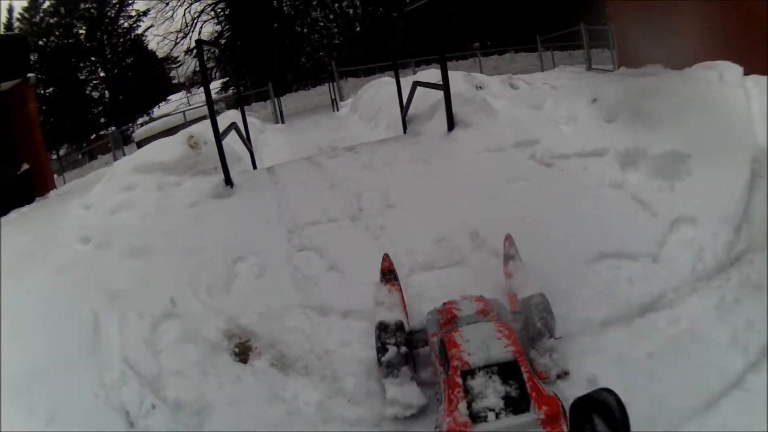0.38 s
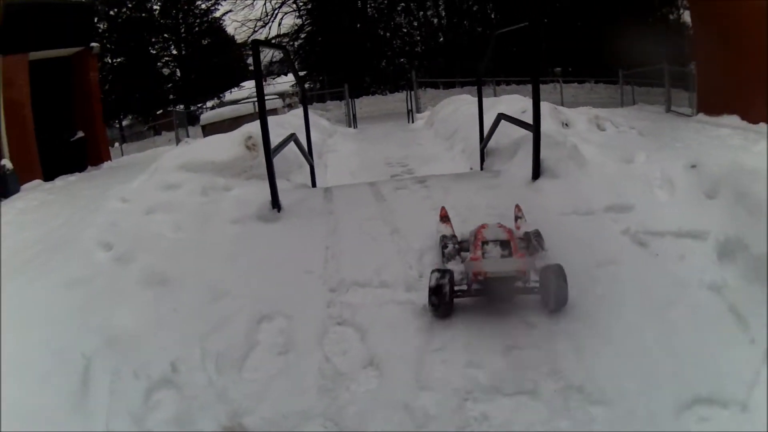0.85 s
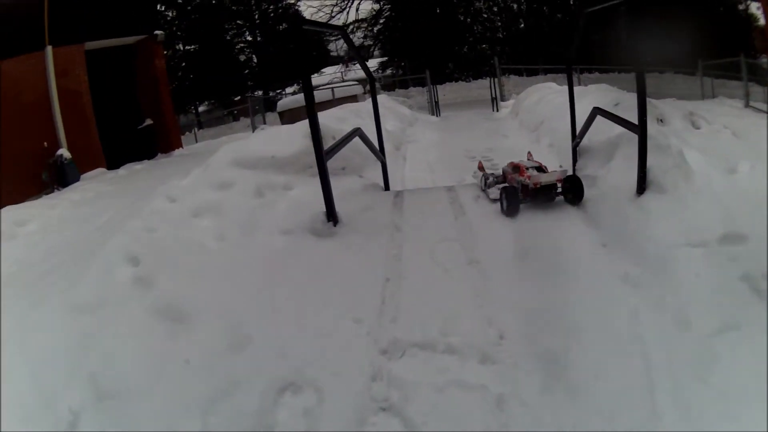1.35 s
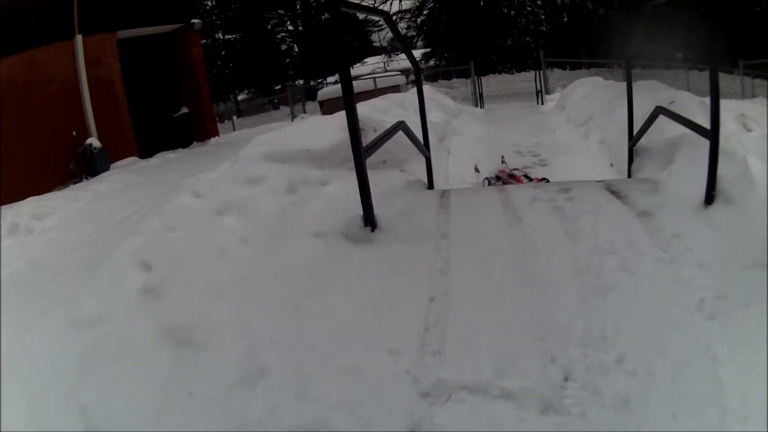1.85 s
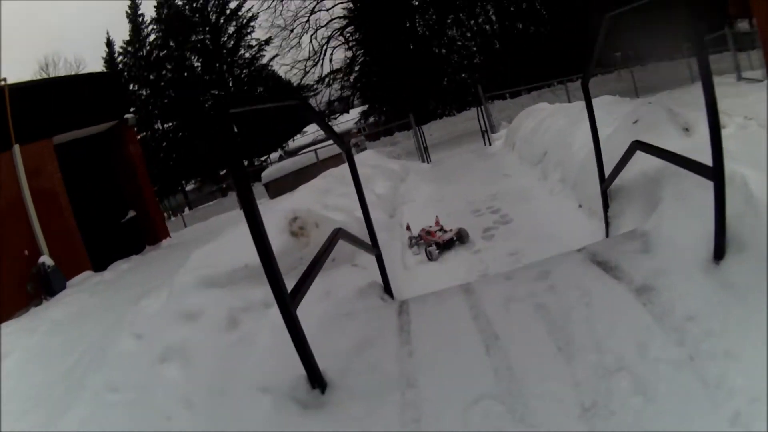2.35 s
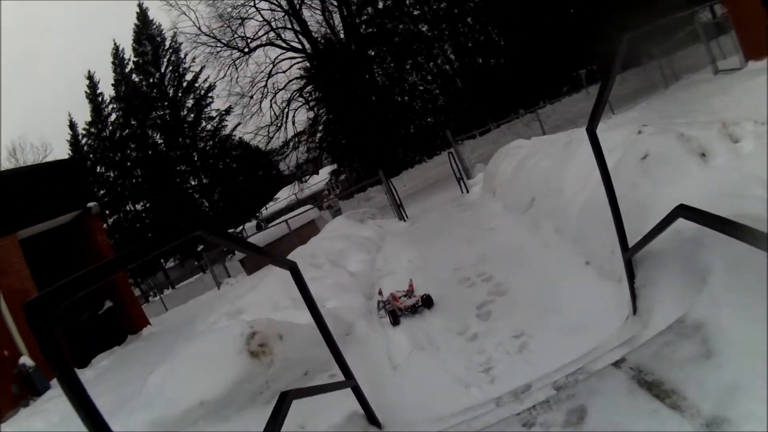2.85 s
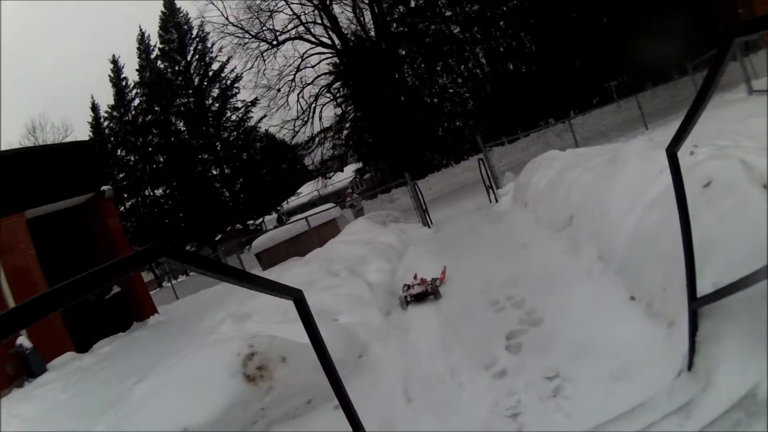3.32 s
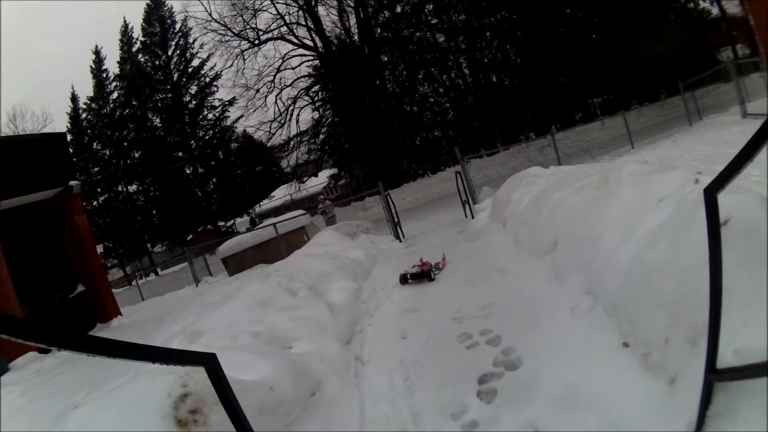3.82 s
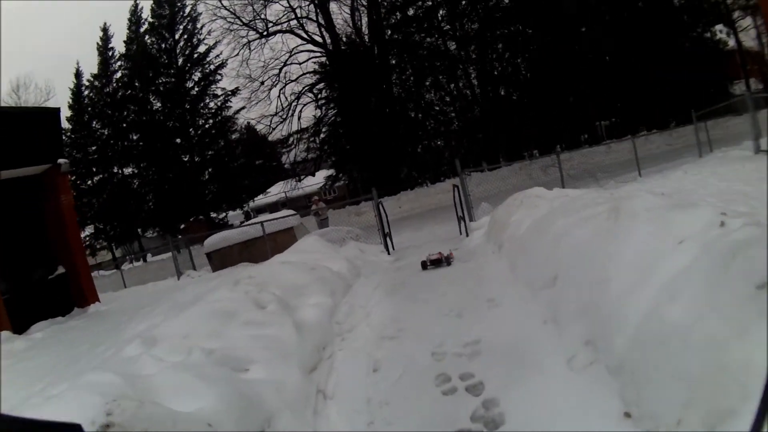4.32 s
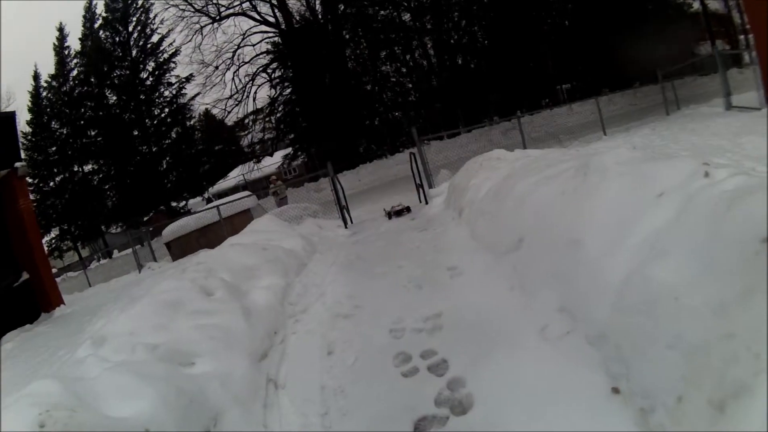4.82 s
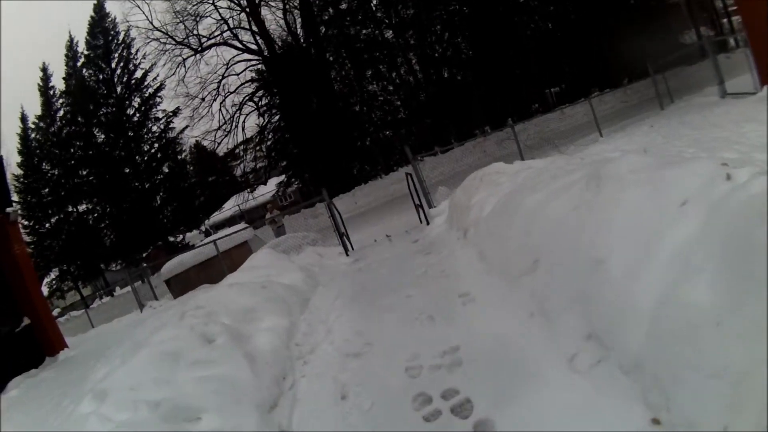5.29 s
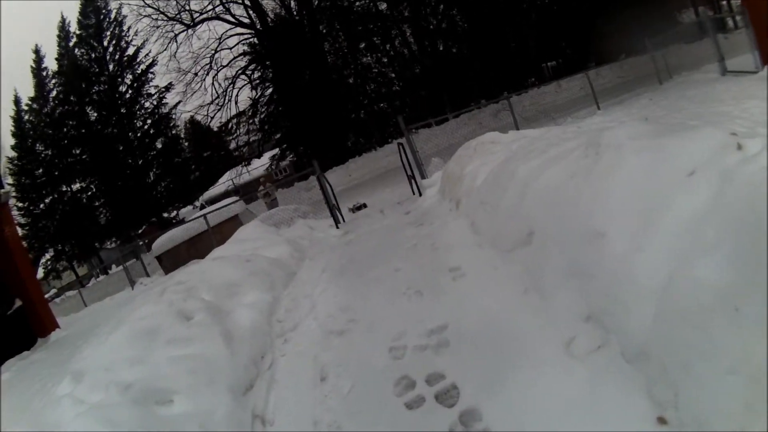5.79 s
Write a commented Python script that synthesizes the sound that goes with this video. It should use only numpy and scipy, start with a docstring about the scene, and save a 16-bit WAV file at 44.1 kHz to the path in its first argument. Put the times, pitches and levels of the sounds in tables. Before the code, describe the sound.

A small electric car works through snow beside a hand-held microphone, outdoors, dry, with a soft steady bed of still air. From 0 to 0.7 s it is loudest: gear whine dives, climbs and wavers over harsh grainy rattle and crunching snow, with dull knocks at 0.35 to 0.5. A second burst sinks until 1.1, with a bright tick at 0.84. After a short lull, from 1.25 to 1.65 the whine sweeps up steeply, then fades. Around 2.0 to 2.2 only ticks and knocks; near-quiet follows, with a faint low hand bump at 2.4. Weaker, distant bursts resume at 2.5, climbing to a piercing peak at 3.35 and dropping quickly by 3.55. Low, fluttering whirrs pulse from 3.65 to 4.75. A last run rises from 4.8 to a very thin squeal near 5.25 and cuts off. Quiet air, sparse ticks and a soft knock end it at 6 s.

```python
"""Small electric car in snow

A small electric car claws its way through snow in a yard and drives off from a hand-held camera.
Gear whine is gliding partials of the tooth rate; loose teeth are dense grains ringing the chassis.
Churned snow is coloured grains that swell at heaps; the speed controller adds thin high tones.
Ticks and knocks are damped rings with a noise crack, a hand bump is a short low swing,
and shaped noise makes the still winter air and the hiss."""
import sys
import numpy as np
from scipy import signal
from scipy.fft import rfft, irfft, next_fast_len
from scipy.io import wavfile

SR = 44100
rng = np.random.default_rng(int(sys.argv[2]) if len(sys.argv) > 2 else 0)


def transcribe(u):
    """Save the signal u as a 16-bit wav file named by the first command-line argument.

    u: samples, shape (n,) or (channels, n), limited to [-1, 1]; the rate is SR.
    q: integer samples, one column per channel.
    """
    v = np.clip(np.atleast_2d(u).T, -1, 1)
    q = np.round(v * 32767).astype(np.int16)
    wavfile.write(sys.argv[1], SR, q)


def gain_from_db(level_db):
    """Convert decibel levels to linear amplitude factors (20 dB per decade)."""
    decades = np.asarray(level_db, float) / 20
    return 10 ** decades


N = 271788

# gear whine glides, one list per burst of throttle: start_s, tooth_rate_hz, level_db before partial shares
BURSTS = [
    [(0.006, 3480, -43), (0.068, 3062, -52.5), (0.104, 2728, -42.5), (0.141, 1903, -45.5),
     (0.199, 1465, -46.5), (0.269, 2158, -43), (0.333, 2900, -38.5), (0.361, 3217, -50), (0.429, 3087, -57),
     (0.463, 3313, -45), (0.537, 2960, -54), (0.64, 2860, -43.5), (0.656, 3085, -58), (0.676, 2535, -37),
     (0.695, 2450, -36.5), (0.738, 1590, -59)],
    [(0.75, 2200, -53), (0.802, 2040, -48), (0.85, 1581, -53), (0.922, 2274, -44), (0.99, 1440, -51.5),
     (1.079, 1320, -66)],
    [(1.181, 1077, -65), (1.233, 1334, -68), (1.261, 1432, -44.5), (1.301, 1880, -46), (1.335, 2520, -49),
     (1.352, 2920, -48), (1.383, 3970, -47), (1.409, 4000, -47), (1.451, 4390, -45), (1.472, 4730, -47),
     (1.51, 5100, -53), (1.54, 5330, -46), (1.576, 5130, -54), (1.602, 5580, -45), (1.63, 5540, -63),
     (1.662, 5090, -64), (1.724, 3910, -67), (1.78, 4170, -70)],
    [(2.5, 1483, -83), (2.56, 1501, -63), (2.61, 1767, -66), (2.66, 1780, -62.5), (2.75, 2500, -52),
     (2.819, 2000, -63)],
    [(2.831, 2060, -74), (2.869, 2450, -54.5), (2.935, 3590, -62), (2.957, 3950, -57), (2.997, 4236, -55),
     (3.031, 4040, -56), (3.071, 4210, -54), (3.097, 4040, -54), (3.141, 4120, -56.5), (3.177, 3930, -52.5),
     (3.215, 5120, -53), (3.296, 6920, -53), (3.322, 6950, -47), (3.358, 7730, -38.5), (3.396, 7570, -42),
     (3.438, 7020, -50), (3.464, 6130, -54), (3.498, 4440, -75), (3.532, 2855, -48.5), (3.58, 1856, -76)],
    [(3.642, 1391, -73), (3.679, 1736, -55), (3.731, 2870, -66), (3.761, 3415, -61), (3.821, 3000, -54),
     (3.849, 2790, -52), (3.883, 2770, -62), (3.911, 2580, -52), (3.935, 2350, -59), (3.971, 1800, -72),
     (4.011, 1962, -62), (4.085, 1930, -58)],
    [(4.097, 2950, -67), (4.124, 3010, -55), (4.212, 2930, -64), (4.296, 3040, -55.5), (4.334, 3440, -66),
     (4.38, 3500, -63)],
    [(4.462, 1922, -75), (4.506, 2160, -66), (4.579, 2660, -54), (4.621, 3016, -55), (4.699, 2230, -62.5),
     (4.729, 2150, -78)],
    [(4.791, 2200, -64), (4.837, 2436, -62), (4.891, 2660, -62), (4.919, 2750, -59), (4.963, 3835, -58),
     (4.992, 4590, -64), (5.002, 4720, -54), (5.036, 5120, -49), (5.058, 5780, -53), (5.078, 6160, -48),
     (5.112, 6690, -49), (5.172, 7500, -47), (5.208, 8800, -49), (5.278, 9760, -59), (5.3, 9400, -80)],
]
# chassis modes: pitch_hz, width_hz, level_db of the ring under the rattle
CHASSIS_MODES = [(1900, 90, -21), (2570, 90, -17), (2880, 90, -15.5), (3250, 100, -16), (4080, 110, -16),
                 (4330, 110, -16), (4560, 140, -12), (5250, 120, -20)]


def rms_one(x):
    """Scale to unit power."""
    return x / np.sqrt(np.mean(x ** 2) + 1e-20)


def in_time(rows):
    """Each column of a table as a value per sample, in straight lines between rows."""
    s, *columns = np.transpose(rows)
    return [np.interp(np.arange(N) / SR, s, column) for column in columns]


def drift(rate_hz):
    """Slow chance: noise twice through a one-pole low-pass, spread 1."""
    step = 20   # samples between slow values
    r = np.exp(-2 * np.pi * step * rate_hz / SR)
    noise = rng.standard_normal(N // step + 2002)
    slow = signal.lfilter([1], [1, -2 * r, r * r], noise)[2000:]   # the filter has settled
    return np.interp(np.arange(N) / step, np.arange(len(slow)), rms_one(slow))


def fade(start_s, end_s, edge_s):
    """A gate with straight edges, half open at start and end."""
    t = np.arange(N) / SR
    return np.clip(np.minimum(t - start_s, end_s - t) / edge_s + .5, 0, 1)


def grains(per_s, spread_db):
    """Random contacts of uneven size and sign; rms 1."""
    sizes = gain_from_db(spread_db * np.minimum(rng.exponential(1, N), 5))
    signed = sizes * rng.choice([-1, 1], N)
    return rms_one(signed * (rng.random(N) < per_s / SR))


def coloured(source, spectrum, patchy_db, patch_rate_hz):
    """A source given a spectrum, split in overlapping bands 0.4 octave apart that each flicker; rms 1."""
    hz, level_db = np.transpose(spectrum)
    size = next_fast_len(N)
    octave = np.log2(np.maximum(np.arange(size // 2 + 1) * SR / size, 1))
    gain_db = np.interp(octave, np.log2(hz), level_db, left=-120, right=-120)
    shaped = rfft(source, size) * gain_from_db(gain_db)
    out = 0
    for centre in np.arange(np.log2(hz[0]), np.log2(hz[-1]) + .4, .4):
        share = np.clip(1 - np.abs(octave - centre) / .4, 0, 1)
        band = irfft(shaped * share, size)[:N]
        out = out + band * gain_from_db(patchy_db * drift(patch_rate_hz))
    return rms_one(out)


def resonance(x, hz, width_hz):
    """A two-pole peak with gain 1 on top."""
    r = np.exp(-np.pi * width_hz / SR)
    poles = [1, -2 * r * np.cos(2 * np.pi * hz / SR), r * r]
    return signal.lfilter([(1 - r * r) / 2, 0, (r * r - 1) / 2], poles, x)


def taps(events, t60_s, crack_db, crack_t60_s, crack_hz):
    """Each tap is a damped ring with a short crack of low-passed noise on its front."""
    length = 4000   # samples
    out, t = np.zeros(N + length), np.arange(length) / SR
    low_pass = signal.butter(3, crack_hz, fs=SR, output="sos")
    cracks = signal.sosfilt(low_pass, rng.standard_normal((len(events), length)))
    for (s, level_db, hz), noise in zip(events, cracks):
        ring = np.sin(2 * np.pi * hz * t) * gain_from_db(-60 * t / t60_s)
        crack = gain_from_db(crack_db - 60 * t / crack_t60_s) * noise
        at = round(s * SR)
        out[at:at + length] += gain_from_db(level_db) * (ring + crack)
    return out[:N]


def side_hiss():
    """Faint shaped noise for the difference between the channels."""
    # hiss spectrum: pitch_hz, level_db per Hz (relative)
    hiss_spectrum = [(60, -21), (145, -13), (685, -7), (2450, -17), (3310, -16.5), (4700, -15.5),
                     (5900, -12.5), (12100, -7.5), (15800, -10)]
    return gain_from_db(-75) * coloured(rng.standard_normal(N), hiss_spectrum, patchy_db=.4, patch_rate_hz=5.1)


def winter_air():
    """Still air: shaped noise with a slight flicker in each band."""
    # air spectrum: pitch_hz, level_db per Hz (relative)
    air_spectrum = [(20, -25), (30, -2), (60, -5), (100, -4), (200, -3), (400, -4), (800, -5.5), (1500, -9),
                    (3000, -9.5), (5000, -12.5), (8000, -16), (12000, -18.5), (15800, -20)]
    return gain_from_db(-59) * coloured(rng.standard_normal(N), air_spectrum, patchy_db=0.3, patch_rate_hz=4.9)


def hand_bump():
    """A hand shifts on the camera: the microphone diaphragm swings low and soon rests."""
    start_s, pitch_hz, level_db, decay_s = 2.424, 50, -48, 0.021
    t = np.clip(np.arange(N) / SR - start_s, 0, None)
    return gain_from_db(level_db) * np.sin(2 * np.pi * pitch_hz * t) * np.exp(-(t / decay_s) ** 2)


def chopper():
    """The speed controller chops the current, and the windings give thin high tones."""
    # chopper tones: start_s, end_s, pitch_hz, level_db before the trim
    chopper_tones = [(.56, 1.05, 11920, -80), (.56, .9, 12075, -86), (2.9, 3.29, 11780, -83)]
    trim_db, flicker_db = 7.0, 2.0
    wander = 1 + .001 * drift(5)
    out = 0
    for start_s, end_s, hz, level_db in chopper_tones:
        level = gain_from_db(level_db + trim_db + flicker_db * drift(25)) * fade(start_s, end_s, .04)
        out = out + level * np.sin(2 * np.pi * hz * np.cumsum(wander) / SR)
    return out


def knocks():
    """Dull knocks close to the microphone: low damped rings with a dark crack."""
    # dull knocks: start_s, level_db of the ring at its start, pitch_hz
    knock_events = [(0.346, -36, 362), (0.425, -31, 920), (0.493, -33, 453), (1.257, -49, 324),
                    (2.068, -38.5, 517), (2.165, -42.5, 750), (4.197, -41, 338), (4.628, -43, 436),
                    (5.084, -43, 400), (5.889, -47, 700), (6.0105, -44, 1100)]
    return taps(knock_events, t60_s=0.018, crack_db=-3.0, crack_t60_s=.018, crack_hz=2400)


def ticks():
    """Bright ticks: high damped rings with a brief crack; most are close to the microphone, one is a flick from
    the whining gears."""
    # bright ticks, mostly close to the microphone; the one at 4.2365 s is a brief flick of the gear whine:
    # start_s, level_db of the ring at its start, pitch_hz
    tick_events = [(0.836, -31, 3260), (0.9755, -46, 3020), (1.3374, -36, 2700), (1.9938, -40, 3670),
                   (2.0283, -47, 4060), (2.1026, -47.5, 3460), (2.542, -44, 2900), (2.7133, -44, 4270),
                   (2.855, -45, 2530), (2.9744, -39, 3790), (3.358, -36, 2720), (3.7298, -38, 2940),
                   (4.105, -44, 2920), (4.2365, -37, 3020), (4.446, -53, 3150), (4.474, -42, 4160),
                   (5.0802, -35, 2810), (5.1282, -33, 2900), (5.3412, -40.5, 2800), (5.6131, -51, 2830),
                   (5.647, -46, 2740), (5.934, -44, 2780), (5.9494, -49, 2340)]
    return taps(tick_events, t60_s=0.012, crack_db=-5, crack_t60_s=0.005, crack_hz=8200)


def churned_snow(snow_db):
    """Lumps break under tyres and skis as coloured grains, swelling where the car breaks through a heap."""
    # heaps of snow: peak_s, peak_db before the trim
    heap_events = [(0.013, -34), (0.428, -32.5), (0.65, -37.5), (1.27, -51.5), (2.62, -54), (2.81, -53),
                   (3.02, -51.5), (3.31, -51), (3.5, -60), (3.67, -55.5), (3.76, -56), (4.44, -58),
                   (4.99, -51), (5.1, -59), (5.9, -61.5), (5.94, -56), (6.0, -60)]
    # spectrum of breaking snow: pitch_hz, level_db per Hz (relative)
    snow_spectrum = [(70, -43), (130, -19.5), (230, -3), (370, 3), (520, -2.5), (750, -3.5), (1400, -4.5),
                     (2200, -11), (3500, -45)]
    rise_db_per_s, fall_db_per_s, trim_db = 346, 259, -4.1
    t = np.arange(N) / SR
    heaps = 0
    for s, peak_db in heap_events:
        below_peak_db = np.maximum((s - t) * rise_db_per_s, (t - s) * fall_db_per_s)
        heaps = heaps + gain_from_db(peak_db - below_peak_db)
    lumps = grains(1800, spread_db=1.5) * gain_from_db(1.6 * drift(24.5))
    texture = coloured(lumps, snow_spectrum, patchy_db=2.0, patch_rate_hz=14.3)
    return gain_from_db(trim_db) * np.hypot(gain_from_db(snow_db), heaps) * texture


def gear_rattle(rattle_db):
    """Dense slack-tooth impacts, broad and through the chassis modes; they come in clumps."""
    # spectrum of the rattle's body: pitch_hz, level_db per Hz (relative)
    body_spectrum = [(900, -20.5), (1500, -8.5), (2200, -8.5), (3200, -3), (4500, -4.5), (5500, -10),
                     (6300, -9), (6750, -24), (7500, -47)]
    # spectrum of the rattle's treble: pitch_hz, level_db per Hz (relative)
    treble_spectrum = [(6200, -53), (6800, -8), (7200, 0), (8300, 1), (9400, -2.5), (10300, -11),
                       (11200, -19), (13000, -36), (15800, -36)]
    trim_db = -5.0
    tooth_hz = in_time(sum(BURSTS, []))[0]
    treble_db = -9 + 3.5 * np.log2(tooth_hz / 2500)   # brighter by 3.5 dB per octave of tooth rate
    impacts = grains(6000, spread_db=2.5) * gain_from_db(1.72 * drift(35))
    rings = 0
    for hz, width_hz, level_db in CHASSIS_MODES:
        rings = rings + gain_from_db(level_db + 4.0 * drift(11)) * rms_one(resonance(impacts, hz, width_hz))
    body = coloured(impacts, body_spectrum, patchy_db=0.99, patch_rate_hz=21) + rings
    treble = gain_from_db(treble_db) * coloured(impacts, treble_spectrum, patchy_db=2.5, patch_rate_hz=29)
    return gain_from_db(rattle_db + trim_db) * (body + treble)


def gear_whine():
    """Teeth meet at a rate set by wheel speed; pitch and level of every partial waver."""
    # shares of the partials as gears speed up: tooth_rate_hz, tooth_db, octave_db, slower_pair_db
    partial_shares = [(1210, 0, 7, -22), (1500, -1.5, -12, -28), (2120, -1.5, -5, -29),
                      (2450, -2, -1.5, -21), (2700, -0.5, -7, -18), (2980, 0, -18.5, -22),
                      (3500, -1, -14, -6), (4000, -20, 3, -11), (4630, -4, -4, -5), (5100, 1.5, -18.5, -11),
                      (6090, -2.5, -32, -10), (7640, -0.5, -35, -20), (9500, -3, -35, -17)]
    # how each burst loads the teeth, added to those shares: octave_db, slower_pair_db
    burst_loads = [(-7.5, 0), (3, -4), (2, 3), (0, -4), (-1, 2), (-4, 2), (-8, -6), (2, -2), (0.5, -9)]
    slow_pair_ratio = .46   # tooth rate of the slower gear pair over the main one
    wobble_share, flutter_db = .014, 3.5
    teeth_per_turn, runout_share = 12.5, .35
    echo_s, echo_share = .0021, 0.19

    shake = 1 + wobble_share * (drift(30) + .6 * drift(150))
    flutter = []
    for depth in (1, 1.4, 1.2, 1.5, 1.5):   # one per partial; deeper flutter sits lower
        flutter.append(gain_from_db(depth * flutter_db * (drift(55) + .5 * drift(200)) + 2.5 - 2 * depth))
    speeds_hz, *shares = np.transpose(partial_shares)
    out = np.zeros(N)
    for burst, (octave_lift_db, pair_lift_db) in zip(BURSTS, burst_loads):
        tooth_hz, level_db = in_time(burst)
        tooth_db, octave_db, pair_db = (
            level_db + np.interp(np.log(tooth_hz), np.log(speeds_hz), share_db) for share_db in shares)
        phase = 2 * np.pi * np.cumsum(tooth_hz * shake) / SR
        runout = 1 + runout_share * np.sin(phase / teeth_per_turn)   # an off-centre pinion beats once a turn
        partials = [(1, tooth_db),
                    (2, octave_db + octave_lift_db),
                    (slow_pair_ratio, pair_db + pair_lift_db),
                    (slow_pair_ratio / 2, tooth_db - 17.5),
                    (3, octave_db - 10.0)]
        sound = 0
        for (ratio, partial_db), flicker in zip(partials, flutter):
            top_fade = np.clip((12000 - ratio * tooth_hz) / 1000, 0, 1)   # silent above 12 kHz
            sound = sound + gain_from_db(partial_db) * flicker * np.sin(ratio * phase) * top_fade
        out += sound * runout * fade(burst[0][0], burst[-1][0], 0.022)

    # a partial swells as it crosses a chassis mode
    out = out + 0.25 * sum(resonance(out, hz, 2 * width_hz) for hz, width_hz, _ in CHASSIS_MODES)
    # the bounce off the snow makes a gliding tone swell and fade
    lag = round(echo_s * SR)
    return out + echo_share * np.concatenate([np.zeros(lag), out[:-lag]])


def microphone_port(x):
    """The microphone's port swallows part of a narrow band around 6750 Hz."""
    return x - .7 * resonance(x, hz=6750, width_hz=500)


def scene():
    """All sources reach one microphone; its port acts on the whine and the taps."""
    # the car at work: start_s, rattle_db, snow_db (both before their trims)
    work_levels = [(0.0, -33, -46), (0.07, -42.5, -42.5), (0.2, -44, -49.5), (0.29, -44.5, -44.5),
                   (0.33, -42, -45), (0.48, -41, -41), (0.65, -40.5, -43), (0.72, -37.5, -50.5),
                   (0.95, -42, -52.5), (1.03, -45.5, -55), (1.23, -53, -56), (1.27, -44.5, -62),
                   (1.38, -46.5, -49.5), (1.47, -42.5, -44.5), (1.68, -41.5, -45), (1.73, -48.5, -60),
                   (1.79, -56.5, -66), (1.95, -49.5, -57.5), (2.01, -58, -59), (2.06, -63, -64),
                   (2.4, -68, -63), (2.47, -48, -65), (2.5, -66, -68), (2.59, -52.5, -74), (2.76, -50, -62),
                   (2.81, -55.5, -59), (2.86, -50.5, -64), (3.05, -50, -58), (3.17, -52.5, -62),
                   (3.23, -49, -55), (3.31, -44, -53), (3.5, -52.5, -54.5), (3.6, -58.5, -57),
                   (3.64, -67, -64), (3.69, -50, -68), (3.76, -50.5, -69), (3.81, -54, -68),
                   (3.91, -52, -58), (4.05, -53.5, -77), (4.2, -58, -59), (4.43, -52.5, -58),
                   (4.44, -47.5, -50), (4.51, -55, -58.5), (4.75, -56, -65), (4.98, -52.5, -60),
                   (5.03, -51.5, -58), (5.16, -46, -51.5), (5.28, -58, -77), (5.39, -63.5, -65),
                   (5.82, -78, -75), (6.16, -87, -80)]
    rattle_db, snow_db = in_time(work_levels)
    pitched = microphone_port(gear_whine() + ticks() + knocks())
    car = gear_rattle(rattle_db) + churned_snow(snow_db) + chopper()
    return np.tile(pitched + car + hand_bump() + winter_air(), (2, 1))


def band_limit(x):
    """A steep low-pass at the top of the band."""
    return signal.sosfilt(signal.butter(12, 15540, fs=SR, output="sos"), x)


def record(dry):
    """A faint hiss of opposite sign sets the two channels apart; the top is cut steeply."""
    stereo = dry + side_hiss() * [[1], [-1]]
    top_cut = signal.ellip(10, .3, 60, 15420, fs=SR, output="sos")   # ripple dB, stop dB, edge Hz
    mix = signal.sosfilt(top_cut, stereo)
    return band_limit(mix)


dry = scene()
out = record(dry)
transcribe(out)
```